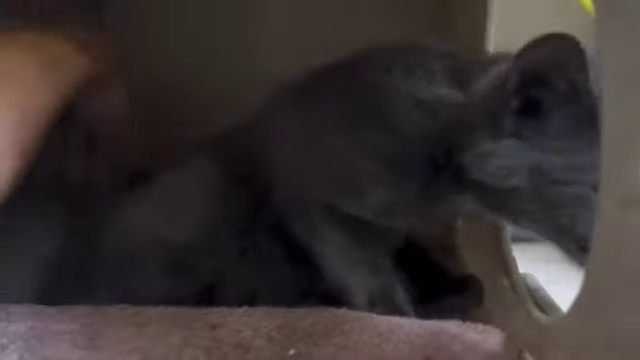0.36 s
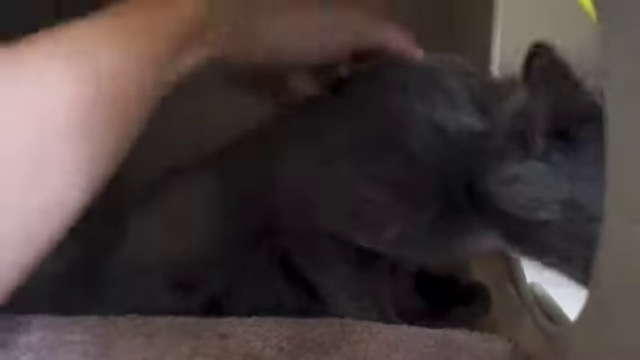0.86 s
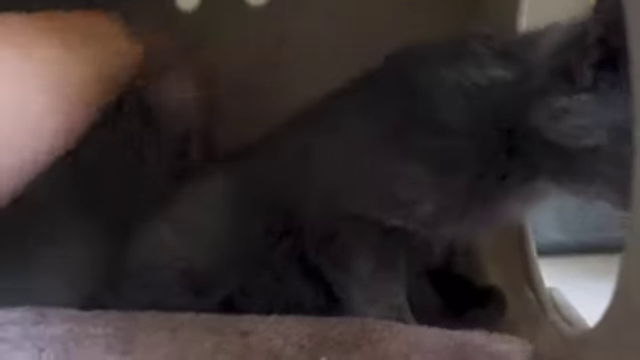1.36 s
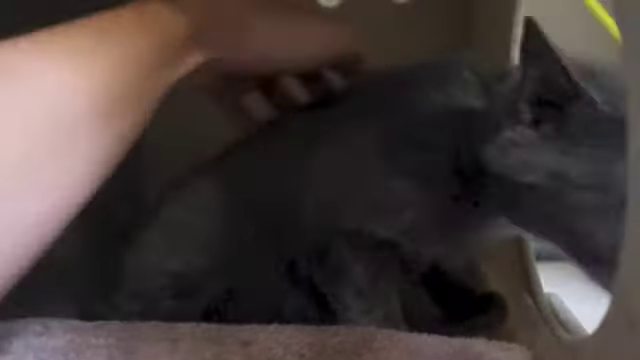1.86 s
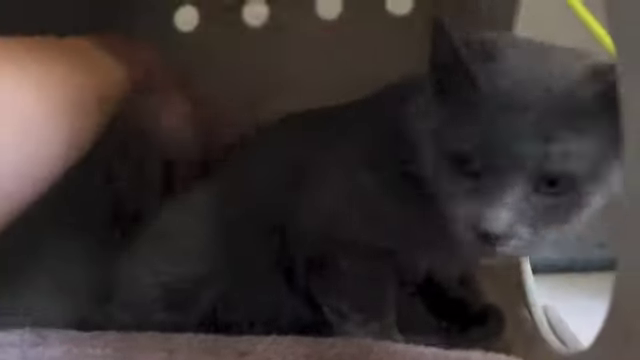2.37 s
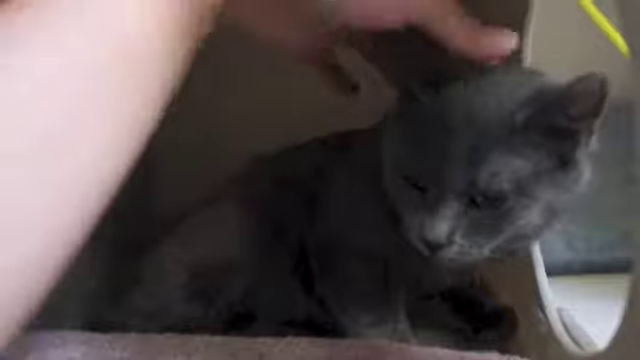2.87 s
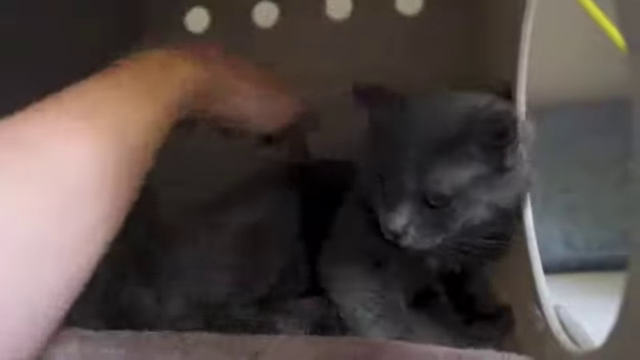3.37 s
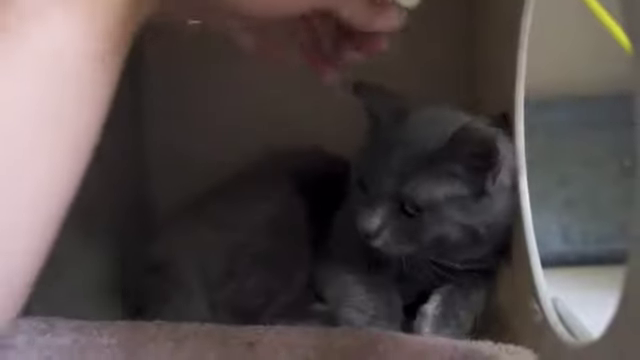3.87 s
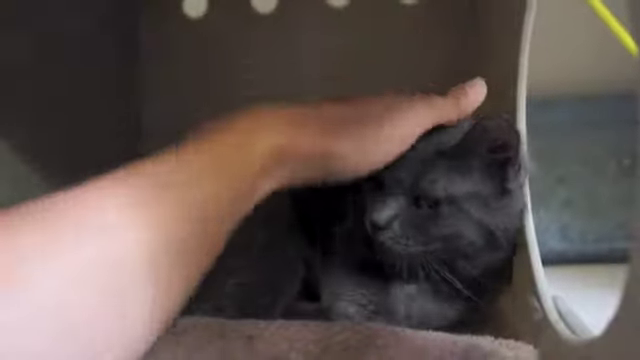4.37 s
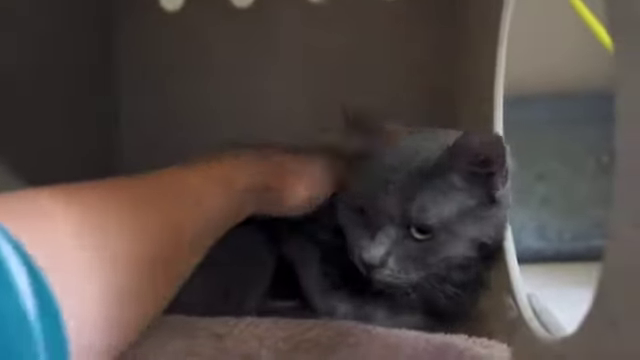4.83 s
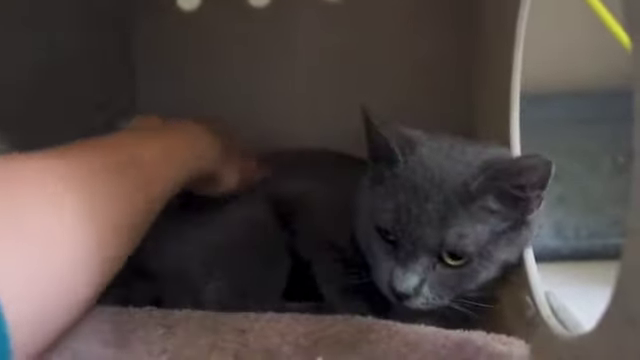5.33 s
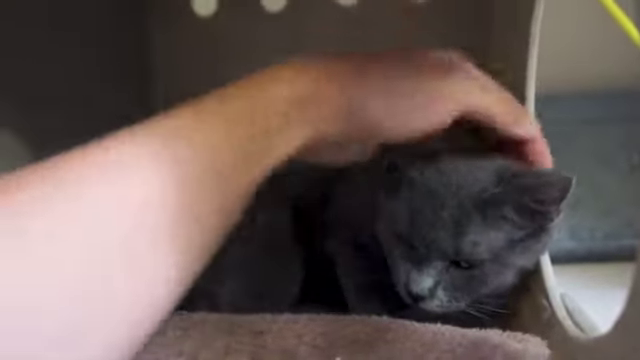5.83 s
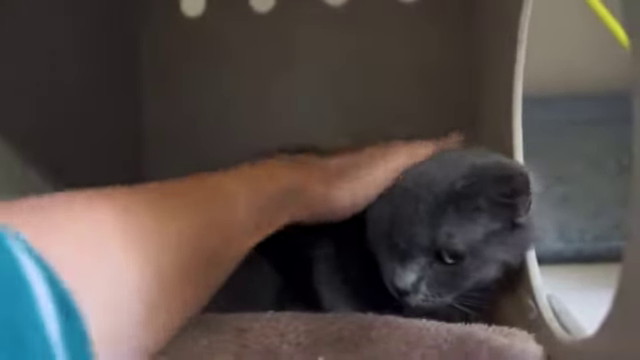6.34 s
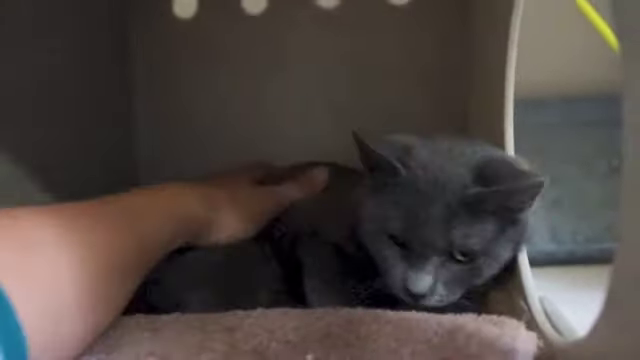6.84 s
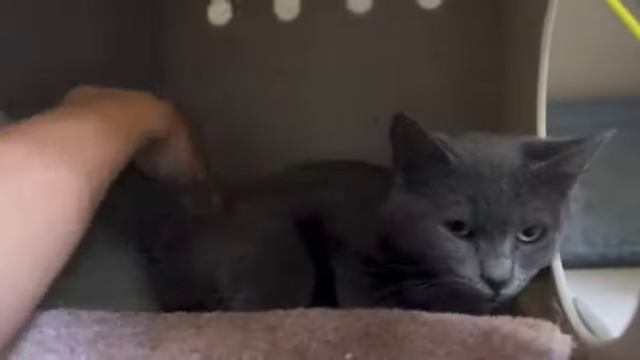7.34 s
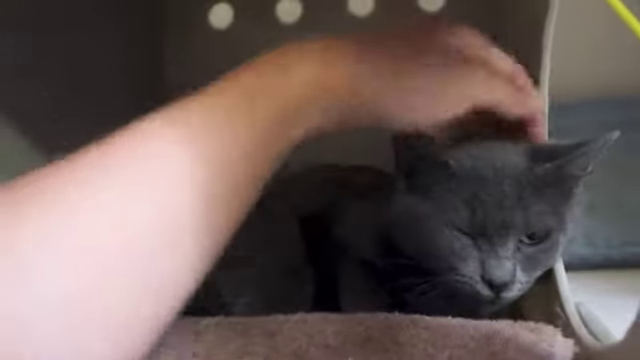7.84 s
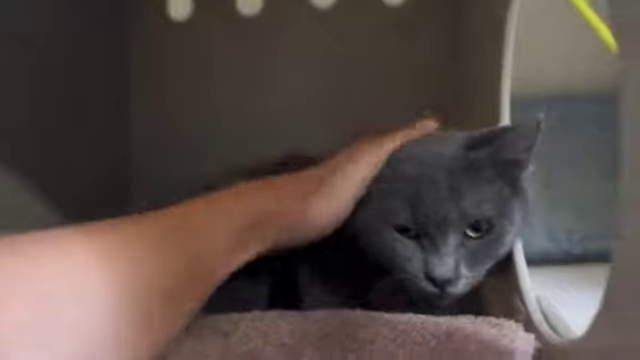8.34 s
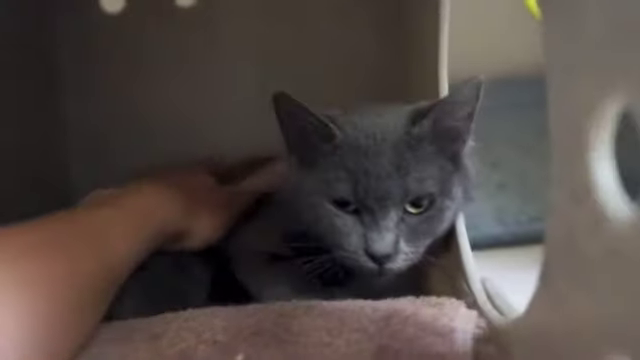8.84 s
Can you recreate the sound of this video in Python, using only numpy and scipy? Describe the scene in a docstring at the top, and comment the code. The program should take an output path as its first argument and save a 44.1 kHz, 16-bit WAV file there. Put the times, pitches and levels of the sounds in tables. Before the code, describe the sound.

Wind buffets the microphone, then a kitten purrs faintly under a steady fan drone as a hand strokes its fur, with soft scuffs and knocks.

```python
"""Draught buffets two microphone ports at once; the recorder's gain control ducks, then creeps back.
A kitten in a small hard-walled den is stroked from the start: noise swells hiss like fur under a hand.
From 1 s it purrs faintly, as pulses ringing a throat; from 3 s its paws scuff, as duller noise swells.
Weaker draughts, made of short swirls, return at 4.6, 7 and 9 s; from 6 s knocks ring the wall modes.
Ticks and crackle dot the treble; throughout, a fan drones as wandering sines and resonant noise."""
import sys
import numpy as np
from scipy import signal
from scipy.fft import rfft, irfft
from scipy.io import wavfile
from scipy.ndimage import uniform_filter1d

SR = 44100
rng = np.random.default_rng(int(sys.argv[2]) if len(sys.argv) > 2 else 0)


def voltage_ratio(decibels):
    """Convert decibels (scalar or array-like) to amplitude ratios, 20 dB per decade."""
    exponent = np.asarray(decibels, float) / 20
    return 10 ** exponent


def unload_wav(signal):
    """Save mono or channel-first audio to the path in sys.argv[1] as 16-bit WAV at rate SR, clipped to [-1, 1]."""
    wavfile.write(
        sys.argv[1],
        SR,
        np.round(np.clip(np.atleast_2d(signal).T, -1, 1) * 32767).astype(np.int16),
    )


N = 405719
T = np.arange(N) / SR
HZ = np.fft.rfftfreq(N, 1 / SR) + 1e-3  # offset keeps the logarithm finite


def add(out, start_s, sound):
    """Mix a sound in at start_s."""
    i = int(np.clip(start_s * SR, 0, N))
    out[..., i:i + sound.shape[-1]] += sound[..., :N - i]


def unit(x):
    """Scaled to rms 1."""
    return x / np.sqrt(np.mean(x ** 2))


def walk(rate_hz):
    """Random levels held 1 / rate_hz and slewed twice; rms 1."""
    hold = int(SR / rate_hz)
    steps = np.repeat(rng.standard_normal(N // hold + 1), hold)
    return unit(uniform_filter1d(uniform_filter1d(steps, hold), hold)[:N])


def along(table):
    """A (Hz, value) table interpolated over log frequency."""
    hz, value = np.transpose(table)
    return np.interp(np.log(HZ), np.log(np.maximum(hz, 1)), value)


def bumps(rows):
    """Sum of short rises and falls in dB."""
    total_db = 0
    for centre_s, half_length_s, db in rows:
        total_db = total_db + db * np.clip(1 - np.abs(T - centre_s) / half_length_s, 0, 1) ** 1.43
    return total_db


# Gusts over the ports. Each row: start of full strength in seconds, hold in seconds,
# nominal level in dB, eddy pitch in Hz at full strength.
GUST_ROWS = [(0, 0.072, -20, 126), (.1, 0.29, -17, 180.3), (.47, 0.027, -28, 111), (4.58, 0.28, -31.5, 109),
             (4.91, 0.08, -33, 108), (7.02, .12, -30.5, 121), (7.17, 0.3, -28, 124),
             (7.531, 0.16, -26, 146), (7.731, 0.19, -24, 131), (9.019, 0.38, -30.5, 132)]


def gust(at_s):
    """Strength and pitch of the strongest gust; eddies spin slower below its full strength."""
    rise_db_s, fall_db_s, db_per_octave = 115, 258, 15
    states = []
    for full_s, held_s, db, hz in GUST_ROWS:
        lack_db = rise_db_s * max(full_s - at_s, 0) + fall_db_s * max(at_s - full_s - held_s, 0)
        states.append((db - lack_db, hz * 2 ** (-lack_db / db_per_octave)))
    return max(states)


def eddy(hz, turns):
    """One swirl: a short swing with a bell-shaped outline."""
    t = np.arange(-1, 1, hz / SR / turns)
    return np.exp(-(t / 0.49) ** 2) * np.cos(2 * np.pi * turns * t)


# Strongest single eddies. Each row: start of the flick in seconds, nominal peak in dB, pitch in Hz.
STRONG_EDDIES = [(.022, -15, 121), (.054, -24, 130), (.102, -18, 149), (.113, -8, 110), (0.129, -11, 124),
                 (.143, -18, 230), (0.152, -10, 230), (.174, -7, 240), (0.189, -14, 233), (0.22, -6, 240),
                 (0.244, -12, 190), (0.264, -9, 115), (.285, -4.5, 206), (0.307, -7.5, 134),
                 (.327, -15, 201), (0.358, -6, 197), (0.371, -9.5, 121), (0.389, -10, 160),
                 (0.412, -6, 190), (.44, -14, 100), (0.504, -20, 75), (4.646, -15.5, 114),
                 (4.699, -14, 130), (4.756, -25, 80.5), (4.801, -11.5, 95), (4.828, -14.5, 84.6),
                 (4.912, -20.5, 100), (7.183, -13, 110), (7.218, -14, 85), (7.291, -15, 100),
                 (7.245, -21, 140), (7.372, -13, 98), (7.427, -25, 87), (7.45, -23, 125), (7.467, -23, 125),
                 (7.537, -9, 142), (7.575, -22, 90), (7.613, -12.5, 186), (7.75, -18, 94),
                 (7.768, -11.5, 99), (7.785, -15.5, 99), (7.834, -26, 132), (7.88, -20, 119),
                 (7.931, -24, 107), (9.114, -29, 120), (9.148, -20.5, 127)]


def draught():
    """Dense irregular eddies differ at each port; strong ones break with a quicker, higher flick."""
    out = np.zeros((2, N))
    spacing = 70  # samples
    for slot, (jitter, size, octaves, left, right) in enumerate(rng.standard_normal((N // spacing, 5))):
        at_s = (slot + 3 * jitter) * spacing / SR
        level_db, hz = gust(at_s)
        if level_db > -50:
            sides = np.clip(size, -1.3, 1.3) + 0.94 * np.array([[left], [right]])
            octaves = np.clip(0.81 * octaves, -1.6, 1.55)
            # quickest and slowest eddies are weaker
            level_db += -1.5 - 3.7 * max(octaves, 0) + 8.8 * min(octaves, 0)
            add(out, at_s, voltage_ratio(level_db) * sides * eddy(hz * 2 ** octaves, turns=1.14))
    flick_db, flick_ratio = -9.5, 1.88
    chances = rng.standard_normal((len(STRONG_EDDIES), 2, 1))
    for (at_s, peak_db, hz), chance in zip(STRONG_EDDIES, chances):
        sides = 1 + 0.37 * chance
        add(out, at_s - 0.6 / hz, -voltage_ratio(peak_db) * sides * eddy(hz, turns=1.15))
        add(out, at_s, voltage_ratio(peak_db + flick_db) * eddy(flick_ratio * hz, turns=0.98))
    return out


def rubbing(rows, octaves, grit_db, size, top_hz):
    """Gritty noise swells, each in a broad band round its centre, dull above top_hz."""
    out = np.zeros(N)
    for start_s, length_s, rise, db, hz in rows:
        n = int(length_s * SR)
        f = np.fft.rfftfreq(n, 1 / SR) + 1
        noise, roughness = rng.standard_normal((2, n))
        grit = noise * voltage_ratio(grit_db * unit(uniform_filter1d(roughness, size=size)))
        band = np.exp(-.5 * (np.log2(f / hz) / octaves) ** 2) / (1 + (f / top_hz) ** 4)
        peak_at = np.clip(rise, .02, .98)
        phase = np.interp(np.arange(n) / n, [0, peak_at, 1], [0, np.pi / 2, np.pi])
        swell = unit(irfft(rfft(grit) * band, n)) * np.sin(phase) ** 0.89
        already_past = max(-int(start_s * SR), 0)
        add(out, start_s, voltage_ratio(db) * swell[already_past:])
    return out


# Hand over fur, and the high hiss of the scrape near 6 s (rows at 5.857 and 6.17 s). Each row: start in
# seconds, length in seconds, # rms in dB before the outline, centre in Hz.
STROKE_ROWS = [(-.1, 0.4, -57.5, 9200), (0.223, 0.14, -50.5, 9500), (.32, 0.11, -52, 8850),
               (0.996, 0.43, -54.5, 15200), (1.897, 0.59, -60, 13700), (2.93, 0.19, -56.5, 10000),
               (3.05, .2, -58, 10000), (4.22, .15, -69, 11000), (4.991, 0.65, -61, 10800),
               (5.857, 0.36, -60, 6500), (6.17, 0.092, -55, 7000), (6.63, 0.48, -58, 9200),
               (7.202, 0.27, -60, 11000), (8.0, 0.15, -62, 8900), (8.13, 0.16, -58, 8700),
               (8.217, 0.74, -62.5, 10800), (8.7, 0.13, -56.5, 9000), (8.97, 0.33, -59, 11800)]


def strokes():
    """Hairs brushed by the hand, and the high edge of the scrape near 6 s, hiss in a broad treble band."""
    rise = 0.43  # share of a stroke
    rows = [(start_s, length_s, rise, db, hz) for start_s, length_s, db, hz in STROKE_ROWS]
    return rubbing(rows, octaves=1.0, grit_db=1.0, size=1500, top_hz=30000)


# Paws and body on the bedding, and the noisy cracks of the knocks near 6.87 and 8.72 s. Each row: start in
# seconds, length in seconds, rising share 0-1, # rms in dB before the outline, centre in Hz.
SCUFF_ROWS = [(2.93, 0.41, 0.2, -57, 3500), (3.055, 0.035, 0.5, -49, 2780), (3.755, 0.05, .5, -49, 2800),
              (4.25, 0.096, 0.7, -49, 700), (5.02, 0.15, 0.4, -43, 990), (5.75, 0.66, 0.37, -39.5, 630),
              (5.7, 0.69, 0.62, -48, 2400), (5.87, 0.26, 0.2, -44, 500), (6.17, 0.12, 0.4, -40, 900),
              (6.68, 0.15, 0.3, -38.5, 650), (6.78, 0.094, 0.5, -38.5, 550),
              (6.874, 0.084, 0.1, -38.5, 1100), (6.93, 0.065, .3, -42.5, 1200),
              (6.874, 0.028, 0, -46.5, 2400), (7.15, 1, 0.03, -46, 810), (8.02, 0.092, 0.4, -54, 3000),
              (8.12, 0.19, 0.5, -41.5, 610), (8.17, .1, 0.44, -50, 2950), (8.722, 0.07, 0.1, -36, 810),
              (8.721, 0.084, 0.1, -50, 2800), (8.779, 0.036, 0, -39, 900), (8.779, 0.053, .1, -51.5, 2800)]


def scuffs():
    """Paws and body shifting on the bedding, and the cracks of the knocks, give rough, duller noise."""
    return rubbing(SCUFF_ROWS, octaves=0.94, grit_db=1.5, size=300, top_hz=5070)


# Breaths of the purr. Each row: start in seconds, length in seconds, relative level in dB.
BREATH_ROWS = [(0.997, 0.49, -21), (1.746, .75, -21.5), (2.55, 0.9, -26), (3.35, .55, -22),
               (4.15, 0.89, -22), (5.204, 0.71, -25), (6.3, .4, -34), (7.1, 0.47, -30), (7.85, 0.83, -25)]
# Throat resonances. Each row: pitch in Hz, damping width in Hz (amplitude decays at pi/2 times it
# per second), relative level in dB.
THROAT_MODES = [(1238, 134, 0.5), (339, 87, 6.5)]


def purr():
    """Slightly uneven strong-weak pulses ring the throat, swelling with each breath."""
    pulse_hz, weak_pulse_db, count = 30, -2, 300
    time_chance, level_chance = rng.standard_normal((2, count))
    times = np.cumsum(1 + .05 * time_chance) / pulse_hz
    breath = 0
    for start_s, length_s, db in BREATH_ROWS:
        breath = breath + voltage_ratio(db) * np.sin(np.pi * np.clip((times - start_s) / length_s, 0, 1)) ** .5
    strength = breath * voltage_ratio(weak_pulse_db * (np.arange(count) % 2) + 2.3 * level_chance)
    t = T[:SR // 25]
    ring = 0
    for hz, width_hz, db in THROAT_MODES:
        ring = ring + voltage_ratio(db) * np.sin(2 * np.pi * hz * t) * np.exp(-np.pi * width_hz * t / 2)
    ring = ring * (1 - np.exp(-t / 0.004))
    pulses = np.zeros(N)
    heard = times < N / SR
    pulses[(times[heard] * SR).astype(int)] = strength[heard]
    return voltage_ratio(-8) * signal.fftconvolve(pulses, ring)[:N]


# Blows on the den wall. Each row: time in seconds, level in dB, best-rung pitch in Hz
# (a harder blow rings higher).
KNOCK_ROWS = [(6.172, -23, 480), (6.195, -22, 550), (6.209, -19, 480), (6.74, -22, 1410),
              (6.875, -15, 1200), (6.905, -20, 1600), (8.722, -9.5, 252), (8.721, -16.5, 1400),
              (8.752, -19, 450)]
# Wall modes. Each row: pitch in Hz, relative level in dB, 60 dB decay time in seconds.
WALL_MODES = [(223, -1, 0.22), (463, 0.5, 0.077), (618, -7, 0.064), (1170, -19, 0.15), (1438, -20, 0.09),
              (1550, -24, 0.28), (1605, -17.5, 0.15), (1990, -38, 0.05), (2880, -24, 0.056)]


def knocks():
    """A soft blow rings the wall modes, a little differently each time."""
    reach_db = 8.5  # lost by a mode one octave from the best-rung pitch
    out, t = np.zeros(N), T[:SR // 4]
    for at_s, db, best_hz in KNOCK_ROWS:
        ring = 0
        for hz, mode_db, t60_s in WALL_MODES:
            level_chance, pitch_chance = rng.standard_normal(2)
            level_db = mode_db - reach_db * abs(np.log2(hz / best_hz)) + 2.0 * level_chance
            tone = np.sin(2 * np.pi * hz * (1 + 0.024 * pitch_chance) * t)
            ring = ring + voltage_ratio(level_db) * tone * 1000. ** (-t / t60_s)
        add(out, at_s, voltage_ratio(db) * ring * (1 - np.exp(-t / 0.0024)))
    return out


# Claw and static ticks. Each row: time in seconds, peak in dB, centre in Hz.
TICK_ROWS = [(.151, -32, 4100), (.189, -46, 2600), (.291, -34, 3300), (1.789, -58, 9000),
             (3.73, -34, 12500), (3.964, -53, 6000), (4.286, -41, 10900), (6.739, -37, 3500),
             (7.96, -29, 4480), (9.11, -42, 13060)]


def ticks():
    """Millisecond snaps of noise round each centre."""
    out, t = np.zeros(N), T[:512]
    for at_s, peak_db, hz in TICK_ROWS:
        edges_hz = [hz / 1.35, min(hz * 1.35, 19000)]
        band = signal.butter(2, edges_hz, "band", fs=SR, output="sos")
        snap = signal.sosfilt(band, rng.standard_normal(512) * np.exp(-t / 0.001))
        add(out, at_s, voltage_ratio(peak_db) * snap / np.abs(snap).max())
    return out


def crackle():
    """Faint static and hair snaps scattered through the treble."""
    snaps_per_s = 40
    occurs, size = rng.random((2, N))
    snap_db = np.minimum(-5.0 * np.log(size + 1e-9), 14.)
    snaps = (occurs < snaps_per_s / SR) * voltage_ratio(snap_db)
    smear = signal.lfilter([1], [1, -.97], snaps) * rng.standard_normal(N)
    band = signal.butter(2, [5000, 15000], "band", fs=SR, output="sos")
    return voltage_ratio(-57.5) * signal.sosfilt(band, smear)


# Fan tones, lowest first. Each row: pitch in Hz, phase wander in radians rms, wanders per second,
# nominal rms in dB, level waver in dB rms, wavers per second.
FAN_TONES = [(28.8, 0.34, 2.14, -34, 1.5, 2.71), (58.66, 0.55, 2.18, -41, 1, 2.77),
             (119.15, 1.54, 5, -38.5, 1.44, 12.), (281.6, 0.74, 3.5, -32, 3, 9.)]
# Fades of the lowest tone. Each row: centre in seconds, half length in seconds.
LULL_ROWS = [(.48, 0.21), (1.214, 0.21), (2.284, 0.56), (3.55, 0.45), (4.38, 0.37), (5.85, .35),
             (7.05, 0.27), (8.3, 0.37), (8.85, 0.33)]
# Uneven surges of the 119 Hz tone. Each row: centre in seconds, half length in seconds, rise in dB.
SURGE_ROWS = [(.78, 0.17, 15.5), (1.25, .15, 6.5), (1.72, 0.29, 6), (1.93, 0.26, 5.5), (2.47, 0.16, 7.5),
              (2.69, 0.24, 11), (3.34, 0.11, 15), (3.65, 0.36, 7), (5.0, 0.15, 7), (5.42, 0.27, 5),
              (5.65, 0.22, 4), (5.93, 0.18, 6), (6.3, 0.11, 6), (6.7, 0.16, 9.5), (7.45, 0.22, 15.5),
              (8.22, 0.11, 10.5), (8.55, 0.081, 7.5), (9.05, 0.099, 9)]


def tones():
    """Sines wander in phase and level; the lowest falls away in lulls, the 119 Hz tone surges unevenly."""
    sines = []
    for hz, wander_rad, wander_hz, db, waver_db, waver_hz in FAN_TONES:
        level = np.sqrt(2) * voltage_ratio(db + waver_db * walk(waver_hz))
        sines.append(level * np.sin(2 * np.pi * hz * T + wander_rad * walk(wander_hz)))
    lowest, second, third, highest = sines
    lull_db = -16
    lulls = bumps([(centre_s, half_length_s, lull_db) for centre_s, half_length_s in LULL_ROWS])
    return lowest * voltage_ratio(lulls) + second + third * voltage_ratio(bumps(SURGE_ROWS)) + highest


# Fan air noise. Each row: frequency in Hz, relative density in dB per Hz.
AIR_SPECTRUM = [(18, -61), (30, -24.5), (90, -19), (190, -23), (300, -11.5), (380, -18.5), (412, -25.5),
                (600, -35.5), (700, -32), (1700, -39.5), (2000, -46), (4000, -53.5), (6500, -60.5),
                (16000, -63)]
# Duct and den resonances. Each row: centre in Hz, width in Hz between quarter-power points,
# power added at the centre in dB relative to the air noise.
DEN_RESONANCES = [(75, 4, 8.5), (118.4, 17, 5), (136.9, 8.5, 12.5), (156.5, 12, 4.5), (219, 26, 8.5),
                  (267, 5.4, 6.5), (291, 4.9, 2.5), (325.8, 10.8, 5), (338.8, 10.6, 7.5), (370.4, 9.5, 2),
                  (394.3, 19, 4), (523.6, 42, 7), (576, 34, 8), (1206, 144, 4.5), (1760, 47, -7),
                  (3090, 1950, 0)]


def air():
    """Fan noise in half-octave bands that swell together and flicker alone, lifted at resonances."""
    lift = 1
    for hz, width_hz, db in DEN_RESONANCES:
        lift = lift + voltage_ratio(db) ** 2 / (1 + ((HZ - hz) / (width_hz / 2)) ** 2) ** 2
    spectrum = rfft(rng.standard_normal(N)) * np.sqrt(voltage_ratio(along(AIR_SPECTRUM)) ** 2 * lift)
    out, swell_db = 0, 0.5 * walk(9)
    position = np.log2(np.clip(HZ, 32, 16384))
    for octave in np.arange(5, 14.1, .5):
        share = np.clip(1 - 2 * np.abs(position - octave), 0, 1)
        flicker_db = 0.6 * walk(12)
        out = out + irfft(spectrum * share, N) * voltage_ratio(swell_db * (octave / 10) ** 2 + flicker_db)
    return unit(out) * voltage_ratio(-28)


# Likeness between the ports. Each row: frequency in Hz, likeness 0-1.
PORT_LIKENESS = [(60, 1), (130, 0.84), (290, 0.93), (640, 0.79), (1410, 0.77), (3100, 0.82), (6820, 0.98),
                 (15000, 0.97)]
# Left ahead of right. Each row: frequency in Hz, phase lead in radians.
LEFT_LEAD = [(0, 0), (120, 0.46), (260, 0.57), (780, 0.84), (1290, 0.71), (1550, 0.022), (1810, 0.36),
             (2670, 0.26), (3270, 0.28), (3880, 0.062), (4650, 0), (15700, 0.22)]
# Left louder than right. Each row: frequency in Hz, difference in dB.
LEFT_EXCESS = [(125, -0.5), (250, -0.6), (500, 1.3), (1000, 1.1), (2000, 1), (4000, 0)]


def ports(near, other):
    """One sound field at two ports: partly alike, the left a little ahead."""
    like = np.clip(along(PORT_LIKENESS), 0, 1)
    common = rfft(near) * np.sqrt((1 + like) / 2)
    unlike = rfft(other) * np.sqrt((1 - like) / 2)
    turn = np.exp(.5j * along(LEFT_LEAD)) * voltage_ratio(along(LEFT_EXCESS) / 2)
    return irfft(np.array([(common + unlike) * turn, (common - unlike) / turn]), N)


def scene():
    """Den sounds reach both ports; the draught acts on each directly."""
    def den():
        return air() + scuffs() + strokes()
    points = tones() + knocks() + ticks() + crackle() + purr()
    return ports(den() + 0.92 * points, den() + 0.35 * points) + draught()


def top_cut(x):
    """Nothing passes above the cut-off."""
    return signal.sosfilt(signal.butter(12, 16090, fs=SR, output="sos"), x)


def record(dry):
    """Gain control falls quickly above a ceiling, climbs back at a fixed pace, ducks treble further."""
    step = 441  # samples
    power = uniform_filter1d(np.mean(dry ** 2, axis=0), size=4410)[::step]
    heard_db = 10 * np.log10(power + 1e-12)
    ceiling_db, fall_s, climb_db_s = -22.5, .2, 3.3
    gain_steps_db, g = [], 0.
    for level_db in heard_db:
        over_db = level_db + g - ceiling_db
        if over_db > 0:
            g = g - over_db * step / SR / fall_s
        else:
            g = min(g + climb_db_s * step / SR, 0.)
        gain_steps_db.append(g)
    gain_db = np.interp(np.arange(N), step * np.arange(len(gain_steps_db)), gain_steps_db)
    bass = signal.sosfiltfilt(signal.butter(1, 2500, fs=SR, output="sos"), dry)
    x = bass * voltage_ratio(gain_db) + (dry - bass) * voltage_ratio(2.0 * gain_db)
    x = 0.62 * np.tanh(x / 0.5)  # the loudest swings are rounded
    # little passes below the lowest tone, and the sound stops steeply near 15.7 kHz
    x = signal.sosfilt(signal.butter(2, 24, "high", fs=SR, output="sos"), x)
    x = signal.sosfilt(signal.ellip(14, .3, 70, 15700, fs=SR, output="sos"), x)
    return top_cut(x)


dry = scene()
out = record(dry)
unload_wav(out)
```